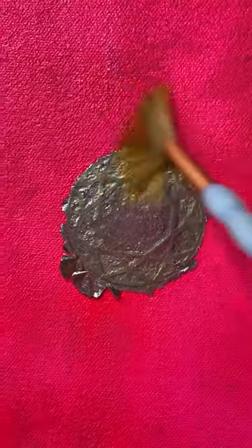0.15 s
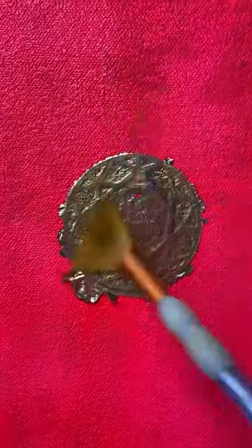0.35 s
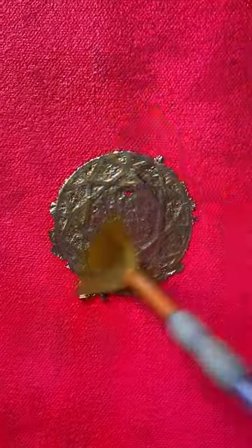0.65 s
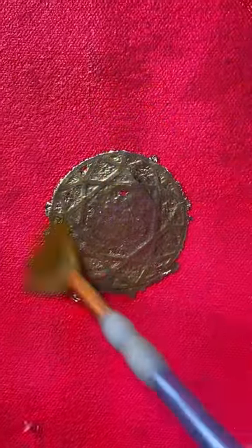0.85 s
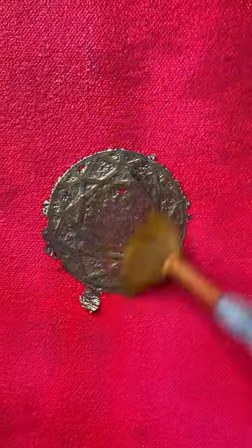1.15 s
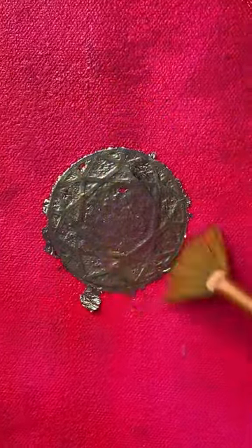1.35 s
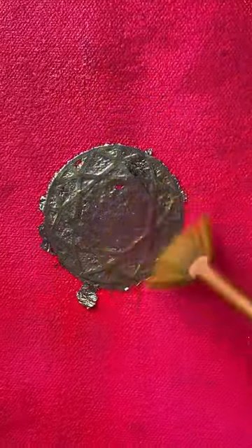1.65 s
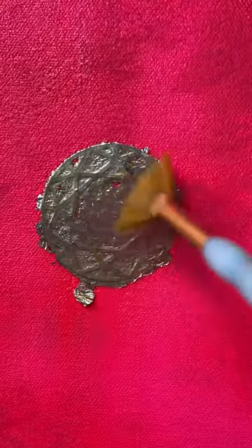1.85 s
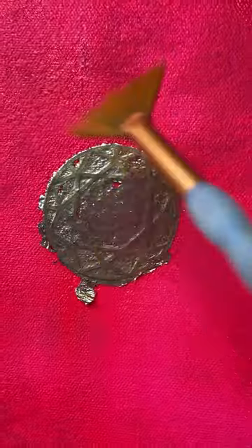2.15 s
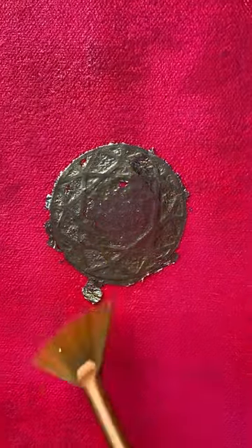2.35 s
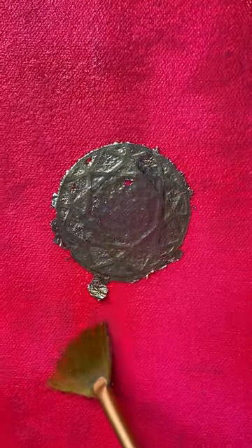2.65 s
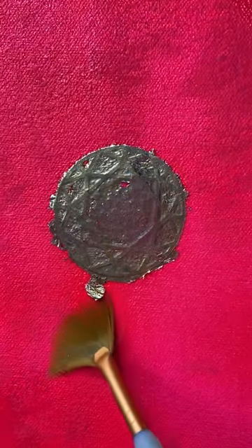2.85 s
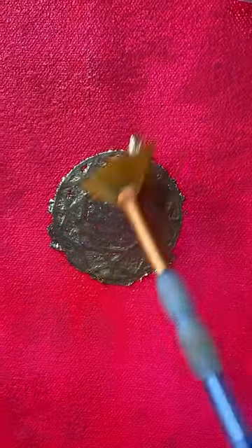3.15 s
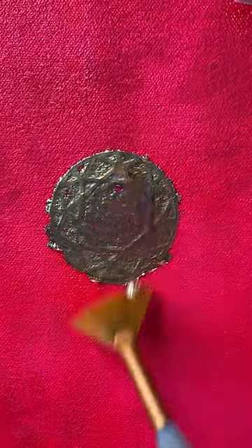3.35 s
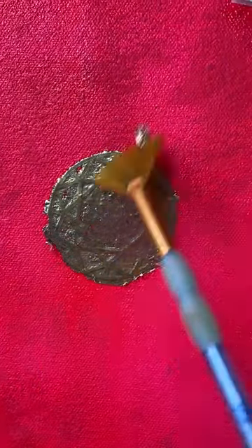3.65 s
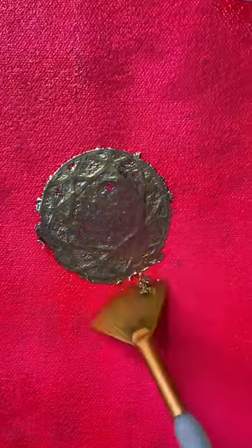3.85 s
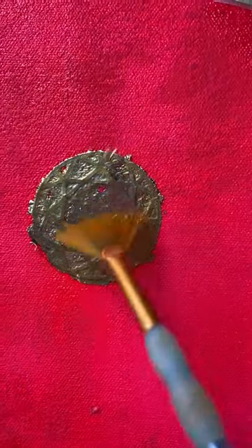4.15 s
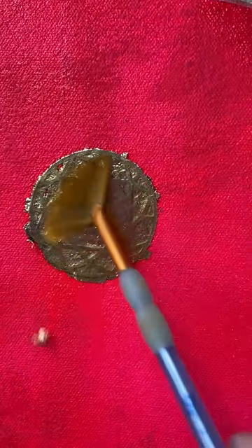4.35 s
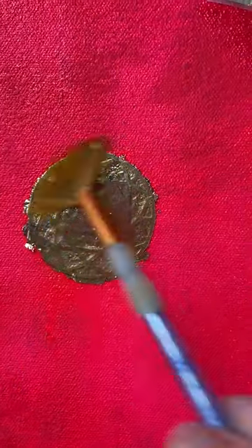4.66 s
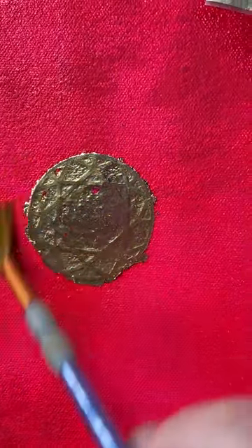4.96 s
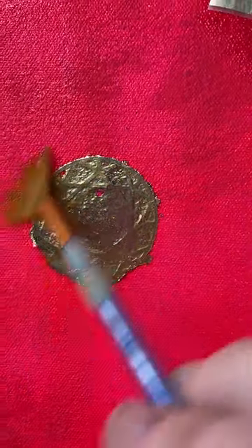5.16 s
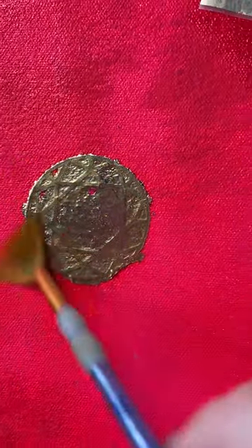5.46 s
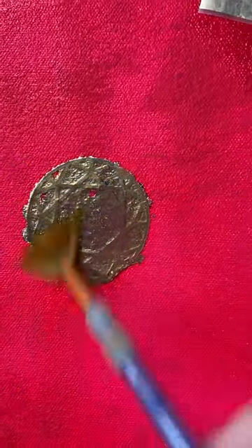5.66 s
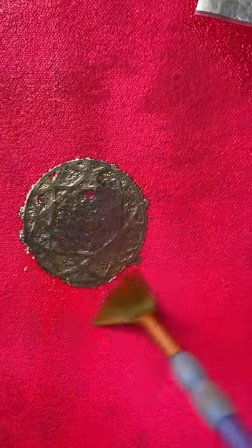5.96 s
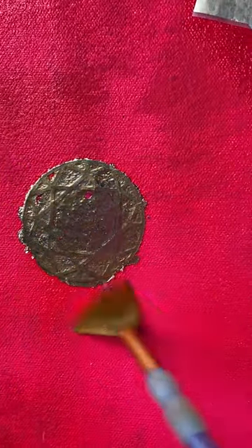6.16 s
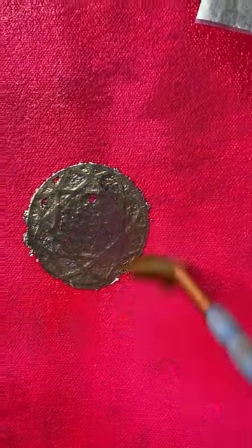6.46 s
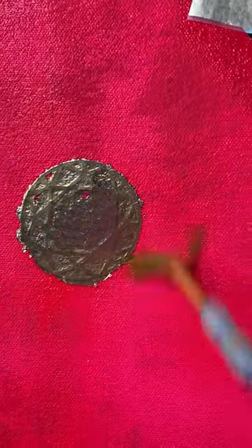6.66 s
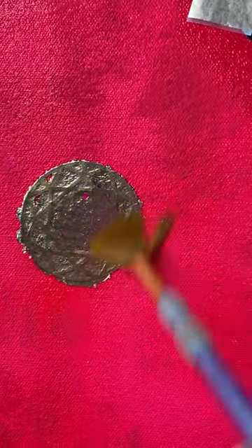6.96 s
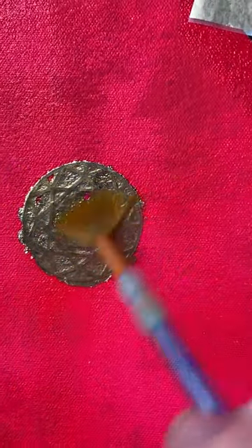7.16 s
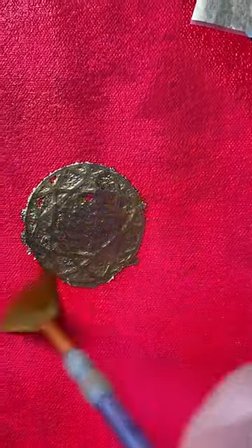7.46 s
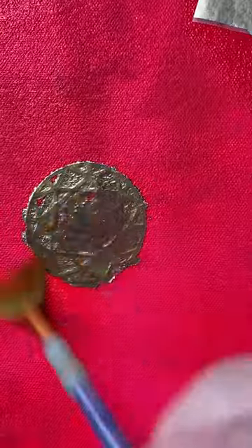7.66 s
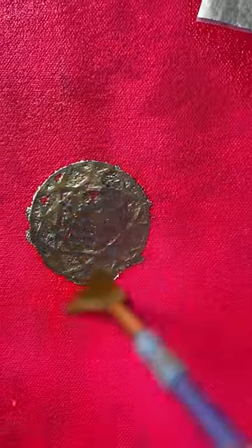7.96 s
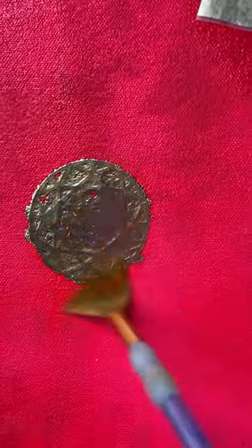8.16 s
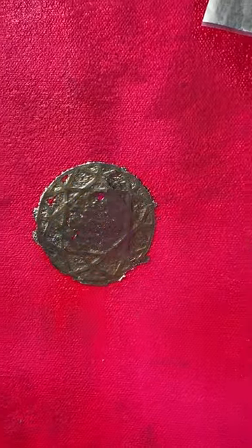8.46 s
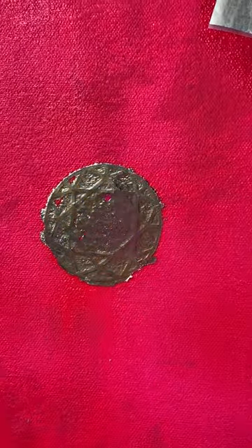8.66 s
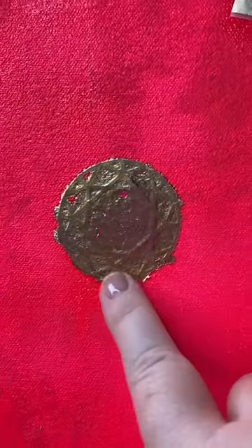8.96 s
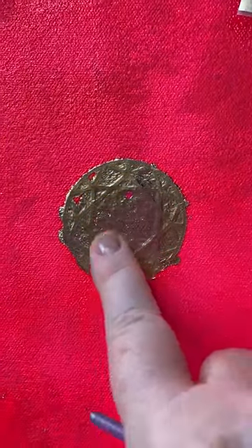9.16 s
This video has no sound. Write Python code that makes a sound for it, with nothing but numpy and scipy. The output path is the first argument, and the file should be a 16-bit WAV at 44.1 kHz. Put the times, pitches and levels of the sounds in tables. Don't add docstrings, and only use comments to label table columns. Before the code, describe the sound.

A steady low room rumble with a softly swelling motor hum and faint buzz lasts throughout, about 9.3 seconds. Very close, a soft fan brush flicks to and fro over metal leaf on canvas from 0.2 to 1.2 s, with airy, ticking hiss and a grainy rasp beneath. Separate strokes follow from 1.4 to 3.1 s, with soft dull bumps at 1.5, 1.7 and 2.0. At 3.43 s the metal collar gives a small double tick with a very short ring; at 3.58 comes the loudest, sharp swipe with a dry crack. Around 3.95 to 4.02 s the ferrule stumbles and lands one heavy, low tap. From 4.3 to 8.3 s quick, uneven scrubbing runs at roughly eight to ten strokes a second, with muffled bumps near 4.3, 6.0, 6.8 and 8.3. Two faint clicks follow at 8.4, then only hum and soft hand thuds from 9.0 to 9.3.

```python
import sys
import numpy as np
from scipy import signal
from scipy.fft import rfft, irfft
from scipy.io import wavfile
from scipy.ndimage import uniform_filter1d

SR = 44100
rng = np.random.default_rng(int(sys.argv[2]) if len(sys.argv) > 2 else 0)


def decibels_to_gain(level_db):
    exponent = np.asarray(level_db, float) / 20
    return 10 ** exponent


def generate_wav(sig):
    pcm = np.round(np.clip(np.atleast_2d(sig).T, -1, 1) * 32767).astype(np.int16)
    wavfile.write(sys.argv[1], SR, pcm)


N = 410130


def rms_one(x):
    return x / np.sqrt(np.mean(x ** 2) + 1e-20)


def coloured(x, spectrum):
    hz = np.fft.rfftfreq(N, 1 / SR) + 1
    points = np.array(spectrum)
    level_db = np.interp(np.log(hz), np.log(points[:, 0]), points[:, 1])
    return rms_one(irfft(rfft(x) * decibels_to_gain(level_db), N))


def drift(rate_hz):
    pole = np.exp(-2 * np.pi * rate_hz * 40 / SR)
    noise = rng.standard_normal(N // 40 + 4002)
    slow = signal.lfilter([1], [1, -2 * pole, pole ** 2], noise)[4000:]
    return np.interp(np.arange(N) / 40, np.arange(len(slow)), rms_one(slow))


def room():
    # f/Hz, level/dB
    room_spectrum = [(25, -36), (45, -4), (75, -0.5), (135, -5.5), (165, -12.5), (200, -1), (320, -4),
                     (500, -10.5), (900, -16), (1900, -28), (2900, -27.5), (5000, -33), (9000, -41.5),
                     (12500, -48), (16000, -42)]
    level_db = -39.5 + 0.59 * drift(2.6)
    return decibels_to_gain(level_db) * coloured(rng.standard_normal((2, N)), room_spectrum)


def motor():
    # t/s, level/dB
    hum_swells = [(0, -42), (.54, -37), (1.53, -42), (2.28, -38.5), (3.29, -41), (3.75, -39.5),
                  (5.26, -40.5), (5.49, -38), (6.6, -41.5), (6.89, -39), (7.41, -38.5), (7.64, -41),
                  (8.18, -41), (8.6, -38.5), (9.17, -39.5), (9.3, -39)]
    # f/Hz, level/dB
    duct_tones = [(130.7, -49), (215, -53)]
    # multiple of the shaft rate, level/dB
    buzz_lines = [(6, -63.2), (16, -72.1), (17, -68.4), (18, -71.6), (19, -77.4), (25, -76.7), (49, -73.3),
                  (50, -71.1), (51, -72.3), (52, -82.7), (54, -81.3), (57, -82.2), (59, -82.1), (61, -82.3),
                  (85, -82.0)]
    hum_hz, shaft_hz = 59, 58.292
    t = np.arange(N) / SR
    hum_db = np.interp(t, *np.transpose(hum_swells)) + 5.0
    out = decibels_to_gain(hum_db) * np.sin(2 * np.pi * hum_hz * t + .5 * drift(0.68))
    for hz, level_db in duct_tones:
        out += decibels_to_gain(level_db + 3.5 + drift(3.4)) * np.sin(2 * np.pi * hz * t + 0.81 * drift(3.55))
    phases = rng.uniform(0, 2 * np.pi, len(buzz_lines))
    for (multiple, level_db), phase in zip(buzz_lines, phases):
        out += decibels_to_gain(level_db + 6.5) * np.sin(2 * np.pi * multiple * shaft_hz * t + phase)
    return out * [[1], [.3]]


def thud(ms, contact_ms, fades_ms, spread_ms):
    turns = 1.26 * np.log(1 + ms / spread_ms) - .006 * ms
    sweep = np.sin(2 * np.pi * turns) * np.exp(-(ms / fades_ms) ** 2)
    return sweep * (1 - np.exp(-(ms / contact_ms) ** 2))


def knocks():
    # t/s, level/dB, contact/ms
    bumps = [(.559, -33, 2.7), (1.456, -28, 3.6), (1.731, -25.5, 6.1), (2.009, -33, 4.9), (3.571, -31, 5),
             (4.32, -27.5, 3.9), (6.044, -25.5, 2), (6.822, -30, 3), (8.32, -26.5, 4.7), (8.96, -30, 3.5),
             (9.12, -30, 3.4), (9.23, -27.5, 1.8), (9.269, -27.5, 3.9)]
    # t/s, level/dB, contact/ms, fade/ms
    taps = [
        (3.9433, -27.5, .3, 5.1),
        (3.9515, -18.5, 1.8, 4.5),
        (3.9552, -15, 2.6, 11),
        (4.0174, -12.6, 1.4, 26),
    ]
    # t/s, level/dB
    cracks = [
        (.559, -36),
        (3.4324, -35),
        (3.4373, -37),
        (3.571, -30),
        (3.943, -31),
        (3.955, -34),
        (4.019, -28),
        (8.41, -44),
        (8.435, -51),
    ]
    # t/s, level/dB
    collar_hits = [
        (3.4319, 0),
        (3.4376, -8),
    ]
    # f/Hz, width/Hz, level/dB
    collar = (1730, 170, -31)
    collar_hz, width_hz, collar_db = collar

    ms = np.arange(SR // 8) / SR * 1000
    ring = np.sin(2 * np.pi * collar_hz * ms / 1000) * np.exp(-np.pi * width_hz * ms / 1000)
    snap = np.exp(-ms / .6) + .3 * np.exp(-ms / 10)
    grit = rng.standard_normal((len(cracks), len(ms))) * snap
    grit = signal.lfilter([.75], [1, -.5], grit)

    hits = [(s, db, crack) for (s, db), crack in zip(cracks, grit)]
    hits += [(s, collar_db + db, ring) for s, db in collar_hits]
    for s, db, contact_ms in bumps:
        hits.append((s, db, thud(ms, contact_ms, fades_ms=5.2 * contact_ms, spread_ms=.63)))
    for s, db, contact_ms, fades_ms in taps:
        spread_ms = .22 + .21 * contact_ms
        hits.append((s, db, thud(ms, contact_ms, fades_ms, spread_ms)))

    out = np.zeros(N + SR)
    for s, level_db, shape in hits:
        start = int(s * SR)
        out[start:start + len(ms)] += decibels_to_gain(level_db) * shape
    return out[:N]


def slips(per_s, spread_db):
    size_db = spread_db * np.minimum(rng.exponential(1, (2, N)), 5)
    ticks = decibels_to_gain(size_db) * rng.choice([-1, 1], (2, N))
    return ticks * (rng.random((2, N)) < per_s / SR)


def ringing(x, tail_ms, tail_db):
    ms, out = np.arange(SR // 25) / SR * 1000, x
    for place in rng.standard_normal((4, len(ms))):
        echo = place * np.exp(-ms / tail_ms)
        echo = echo / np.linalg.norm(echo)
        out = out + signal.oaconvolve(x, echo[None])[:, :N] * decibels_to_gain(tail_db + 6.8 * drift(6.1))
    return out


def evened(x):
    return x / np.sqrt(uniform_filter1d(np.mean(x ** 2, axis=0), size=2000) + 1e-20)


def swell(t, peak_s, rise_ms, fall_ms, peak_db):
    away = 1000 * np.abs(t - peak_s) / np.where(t < peak_s, rise_ms, fall_ms)
    return decibels_to_gain(2 * (peak_db - 7.2 * away ** 1.74))


def brush():
    # f/Hz, level/dB
    hiss_spectrum = [(1500, -10.5), (3000, -10.5), (4300, -5), (5200, -1.5), (6300, -5), (7500, -1.5),
                     (9000, -3.5), (11500, -1.5), (14000, -4), (16000, 2)]
    # f/Hz, level/dB
    rasp_spectrum = [(250, -9), (600, 3), (1400, 1.5), (1900, -4), (2500, -0.5), (3300, -12), (5000, -8),
                     (8000, -29.5)]
    # t/s, level/dB
    contact = [(0, -62), (.08, -56), (.65, -48.5), (1.1, -57), (1.25, -67), (1.45, -62.5), (2.65, -71),
               (3.95, -76), (4.01, -55), (4.25, -75), (4.35, -58.5), (5.45, -50), (6.0, -53), (7.0, -58.5),
               (7.4, -47.5), (8.42, -59.5), (8.52, -66), (9.3, -80)]
    # t/s of the fastest drag, hiss level/dB, half length/ms, rasp above hiss/dB
    flicks = [
        (.17, -52, 27, -10),
        (.275, -46, 53, -3),
        (.432, -45, 57, -17),
        (.553, -42, 30, -6),
        (.698, -40, 39, -25),
        (.825, -40.5, 46, -4),
        (.950, -39, 31, -17),
        (1.068, -42.5, 33, -10),
        (1.156, -47.5, 30, -11),
    ]
    passes = [(1.451, -41, 26, -4), (1.757, -43, 37, -2), (2.021, -42, 25, -5.5), (2.325, -43, 15, -8),
              (2.375, -48, 35, -8), (2.454, -46, 23, 0), (2.75, -56, 66, -4), (2.96, -47.5, 110, -5),
              (3.087, -42, 48, -.5), (3.525, -46.5, 43, 1), (3.584, -31.5, 25.7, -7), (3.645, -53, 25, -7),
              (3.938, -45.5, 20, -4)]
    scrubbing = [(4.334, -43, 39, -3), (4.468, -43.5, 35, -5), (4.603, -39.5, 48, -12),
                 (4.736, -40.5, 45, -3), (4.857, -46.5, 42, -3), (4.970, -40.5, 29, -1.5),
                 (5.079, -37, 33, -11), (5.212, -46, 23, 4), (5.285, -45.5, 47, -8), (5.445, -42.5, 31, -4),
                 (5.535, -42, 52, -22), (5.671, -40, 20, -9), (5.779, -40, 33, -2), (5.894, -42.5, 26, -6),
                 (5.979, -41.5, 32, -2), (6.04, -40.5, 20, 2.7)]
    lower_rim = [(6.234, -43, 46, 0), (6.351, -44, 20, -0.5), (6.456, -38, 32.5, -0.2),
                 (6.571, -41.5, 21, -2), (6.673, -38, 22, 0), (6.780, -43, 31, 0), (6.889, -40.5, 27, 0.3),
                 (6.992, -43, 22, -2.5), (7.077, -41.5, 20, -2.5), (7.199, -41, 25, -19),
                 (7.292, -40, 19, -5), (7.438, -36.5, 35, -7.5), (7.521, -37, 30, -2.5),
                 (7.652, -44, 36, 0.5), (7.750, -38.5, 30, -4.5), (7.873, -44.5, 37, -3),
                 (7.977, -40, 39, -2), (8.130, -48.5, 50, -5.5), (8.217, -48.5, 19, -3),
                 (8.324, -40, 23, -13)]

    t = np.arange(N) / SR
    hiss = decibels_to_gain(2 * np.interp(t, *np.transpose(contact)) - 4.5)
    rasp = hiss * decibels_to_gain(-4.0)
    for s, level_db, half_ms, rasp_db in [*flicks, *passes, *scrubbing, *lower_rim]:
        near = slice(max(int((s - .3) * SR), 0), int((s + .3) * SR))
        rise_ms, fall_ms = 1.03 * half_ms, 0.97 * half_ms
        hiss[near] += swell(t[near], s, rise_ms, fall_ms, level_db - 1)
        rasp[near] += swell(t[near], s + .0036, 0.9 * rise_ms, 0.9 * fall_ms, level_db + rasp_db - 2.0)
    tips = coloured(slips(per_s=11000, spread_db=2.8), hiss_spectrum)
    tips = evened(ringing(tips, tail_ms=3, tail_db=-12))
    weave = coloured(slips(per_s=2500, spread_db=3.8), rasp_spectrum)
    weave = evened(ringing(weave, tail_ms=3.5, tail_db=-10))
    return np.sqrt(hiss) * tips * decibels_to_gain(2.0) + np.sqrt(rasp) * weave * decibels_to_gain(0.75)


def ports(pair, column):
    # f/Hz, level/dB, likeness of far sound, likeness of near sound
    port_match = [(40, -1.5, .999, .999), (133, -2.5, 0.89, 0.3), (255, -7, 1, 0.36),
                  (410, -11.5, 0.33, 0.51), (594, -3, 0.4, 0.73), (930, -2.5, 0.13, 0.15),
                  (1450, -.5, 0.43, 1), (1830, -0.4, 1, 1), (2900, 0.4, 0.47, 0.94), (4600, -2, 1, 0.69),
                  (4700, 0, 0.47, 0.86), (6500, 0.2, 1, 1)]
    # f/Hz, level/dB, likeness
    treble_match = (8000, 0, .975)
    # f/Hz, lead/rad
    left_lead = [(40, -.1), (350, 0), (700, 1.3), (1100, .6), (1600, 0), (2700, .7), (4400, 1.2), (5000, 0),
                 (7400, 3.14), (10350, 6.28), (13600, 9.42), (16800, 12.56)]
    hz, table = np.fft.rfftfreq(N, 1 / SR), np.array(port_match)
    treble_hz, treble_db, treble_alike = treble_match
    at = [*table[:, 0], treble_hz]
    level_db = np.interp(hz, at, [*table[:, 1], treble_db])
    alike = np.clip(np.interp(hz, at, [*table[:, column], treble_alike]), 0, 1)
    first, second = rfft(pair)
    shift = decibels_to_gain(level_db) * np.exp(1j * np.interp(hz, *np.transpose(left_lead)))
    left = irfft(shift * (alike * first + np.sqrt(1 - alike ** 2) * second), N)
    return np.array([left, pair[0]])


def scene():
    far = room() + motor()
    near = brush() + knocks() * [[1], [.7]]
    return ports(far, column=2) + ports(near, column=3)


def band_limit(x):
    return signal.sosfilt(signal.butter(12, 16870, fs=SR, output="sos"), x)


def record(dry):
    bass_cut = signal.butter(2, 30, "high", fs=SR, output="sos")
    top_cut = signal.ellip(12, .2, 50, 15750, fs=SR, output="sos")
    mix = signal.sosfilt(top_cut, signal.sosfilt(bass_cut, dry))
    return band_limit(mix)


dry = scene()
out = record(dry)
generate_wav(out)
```